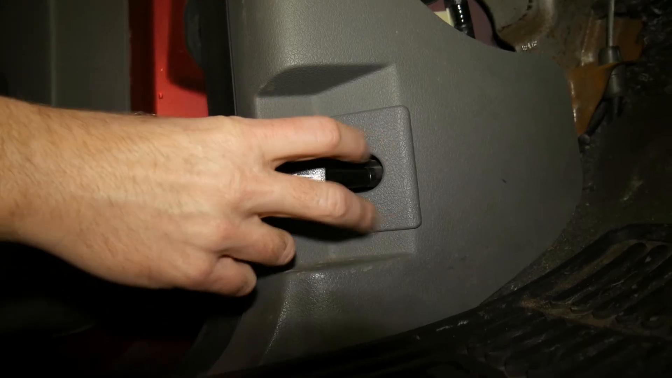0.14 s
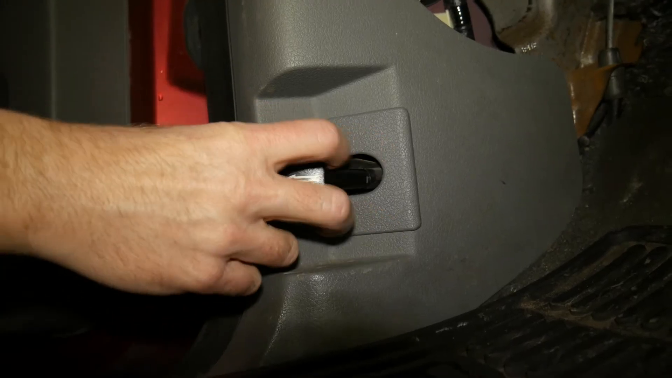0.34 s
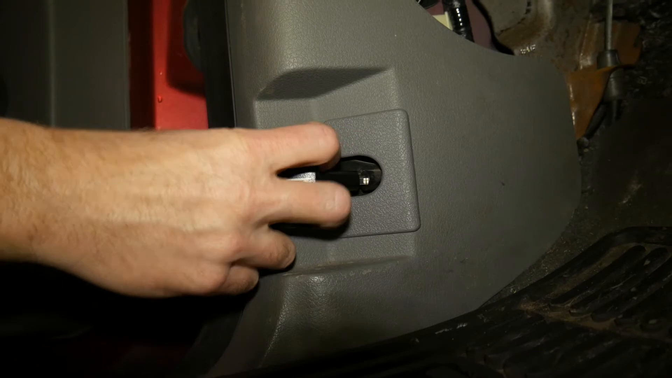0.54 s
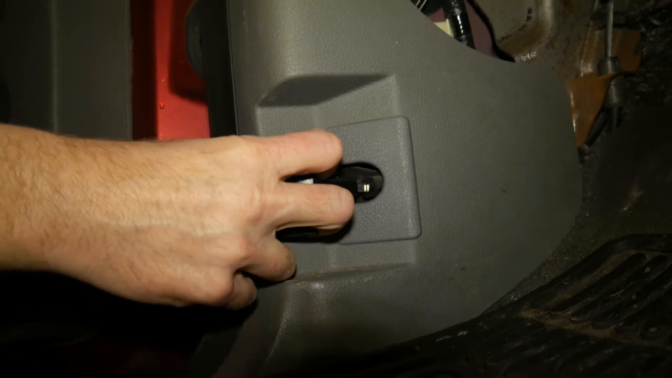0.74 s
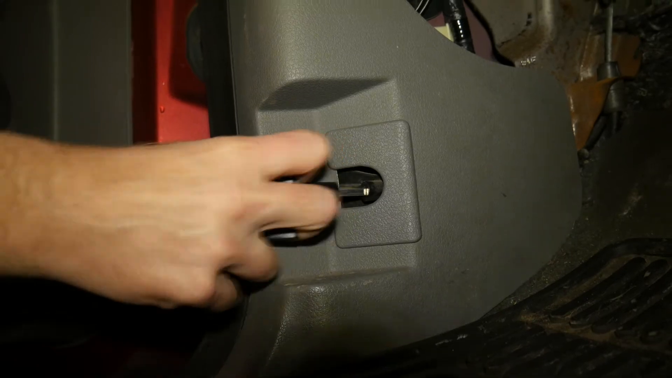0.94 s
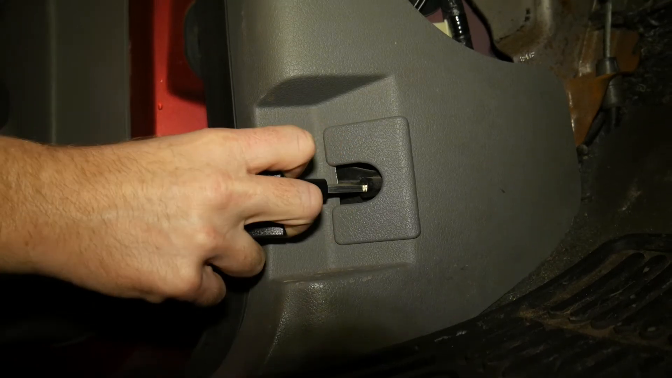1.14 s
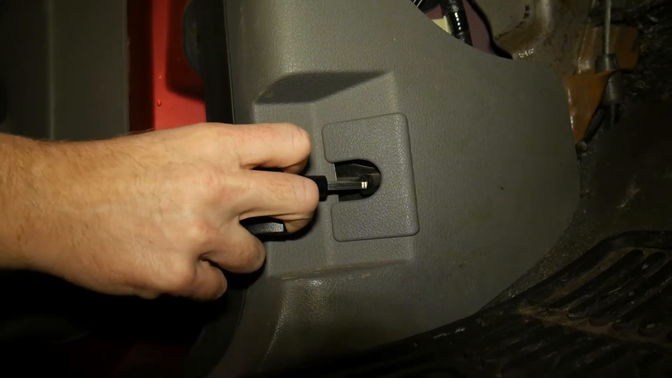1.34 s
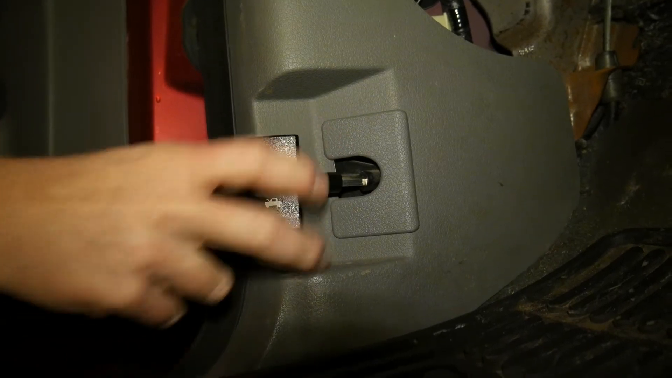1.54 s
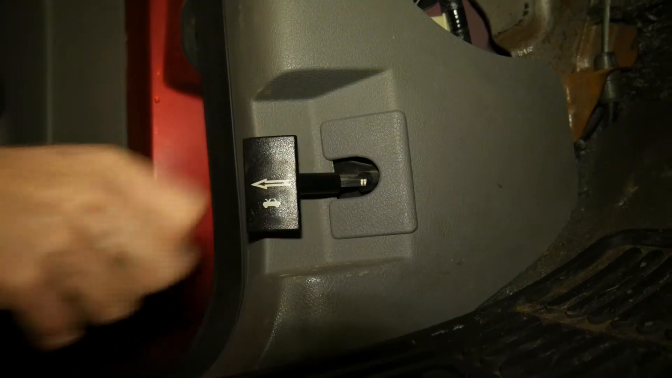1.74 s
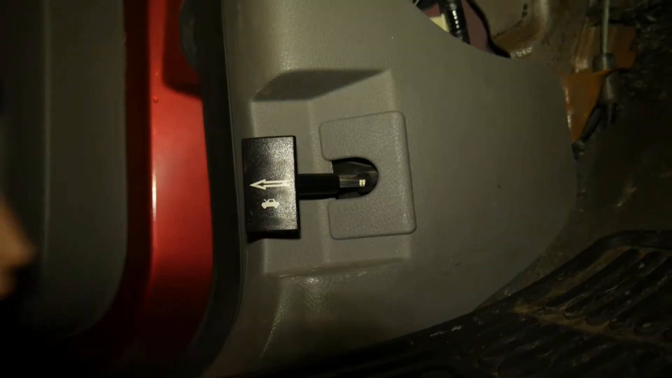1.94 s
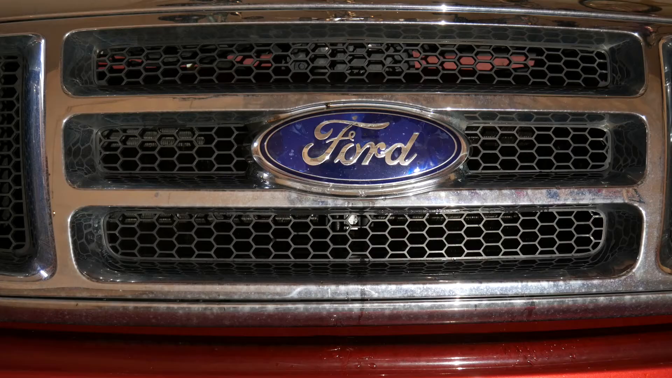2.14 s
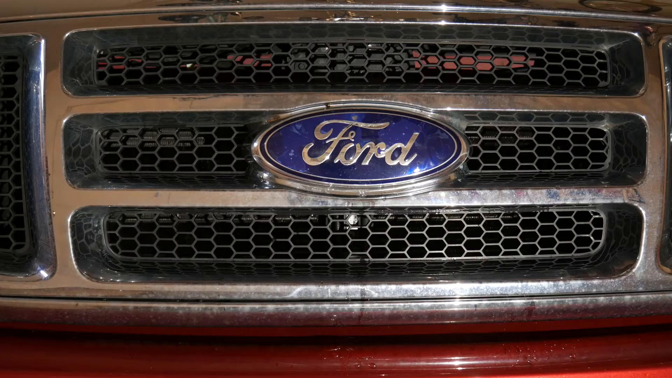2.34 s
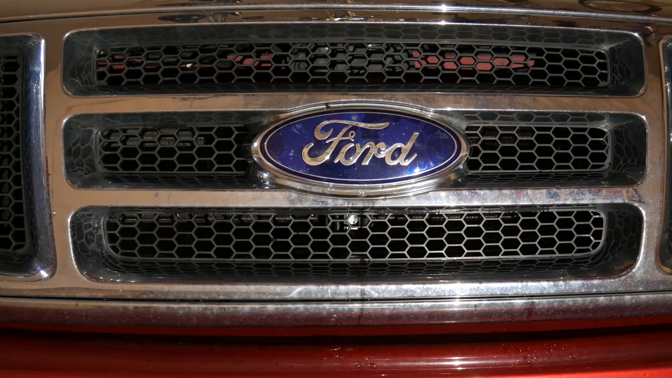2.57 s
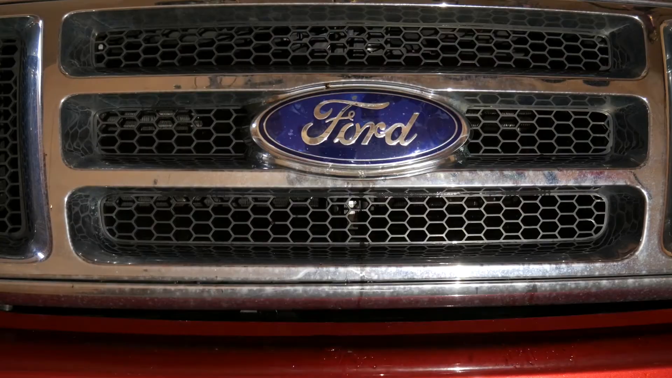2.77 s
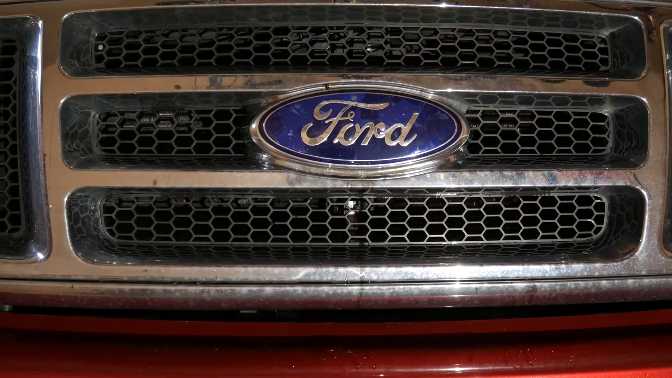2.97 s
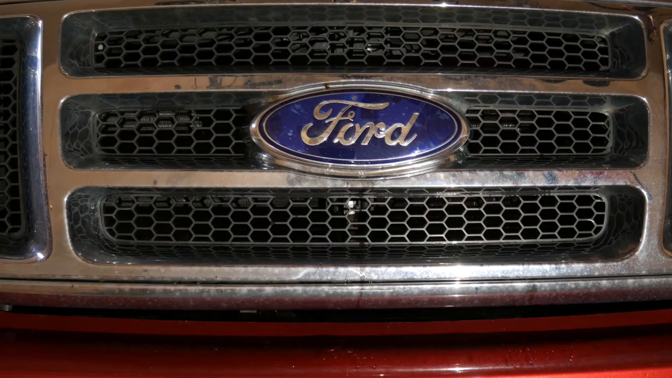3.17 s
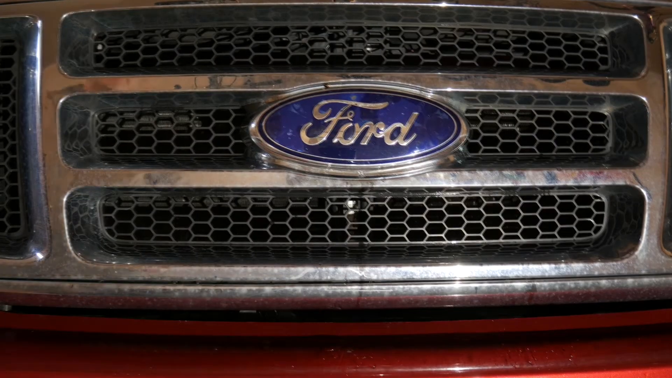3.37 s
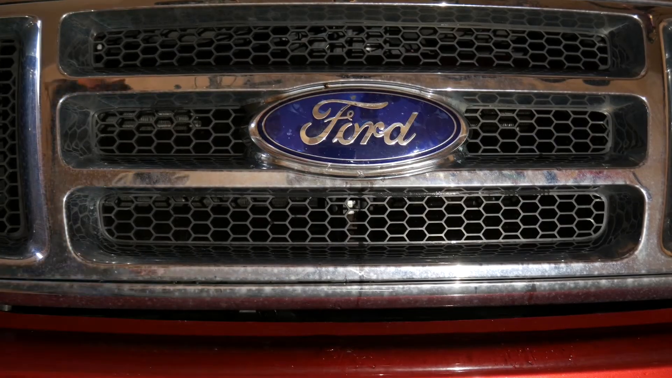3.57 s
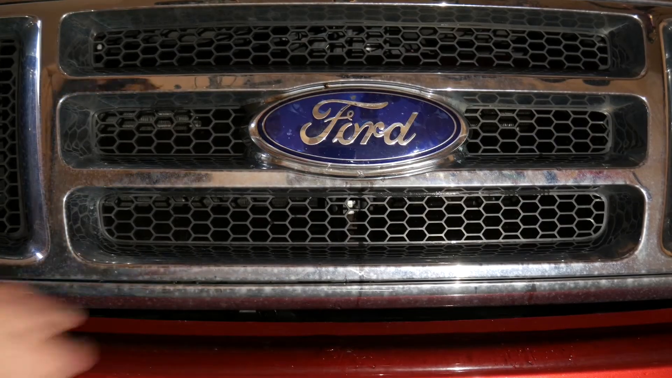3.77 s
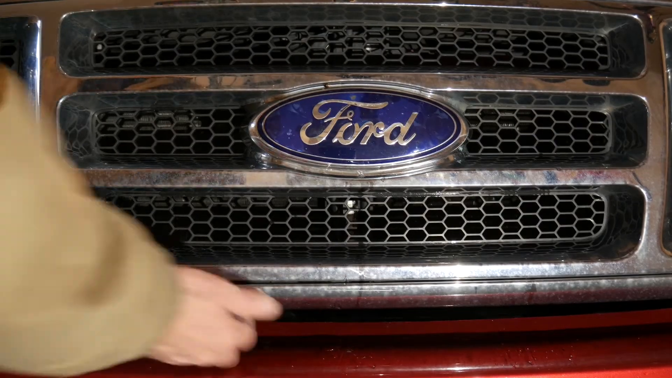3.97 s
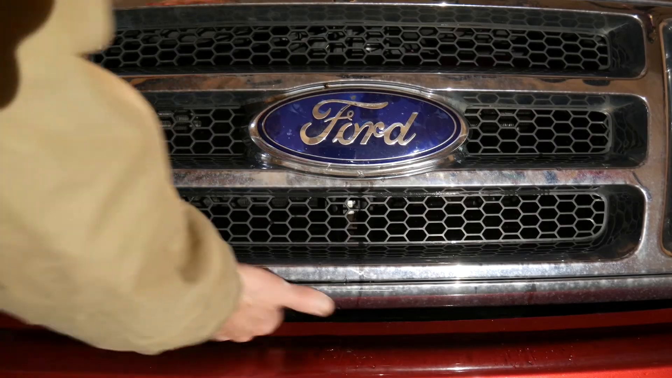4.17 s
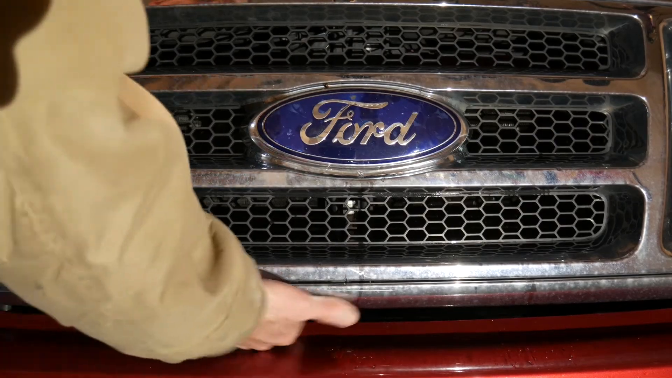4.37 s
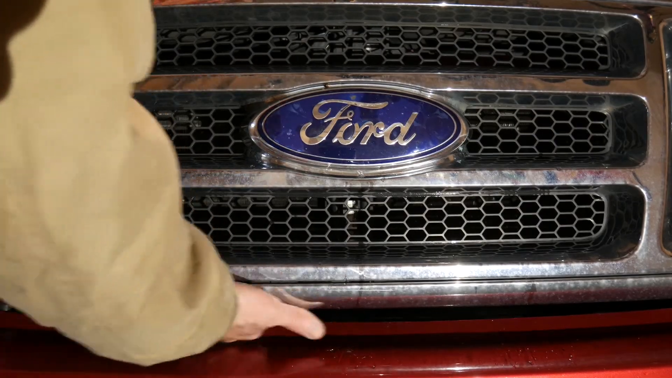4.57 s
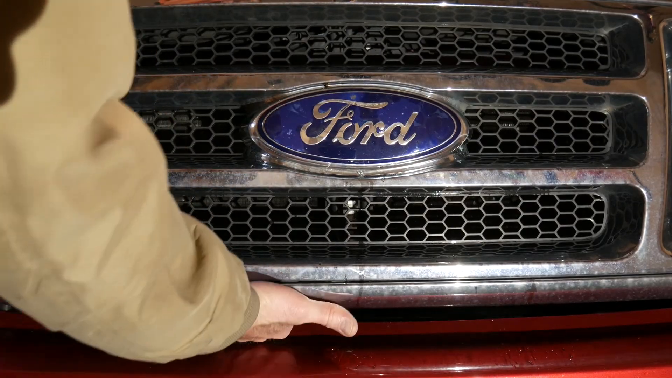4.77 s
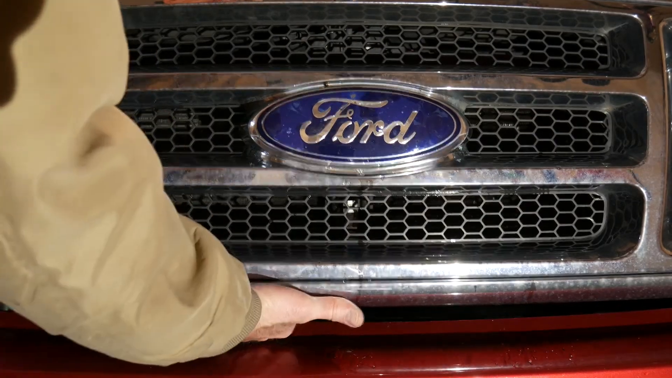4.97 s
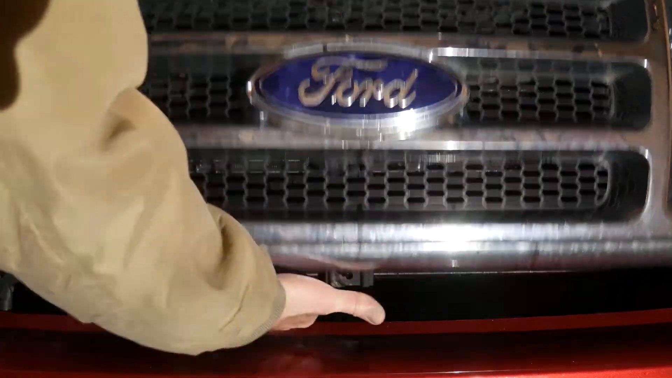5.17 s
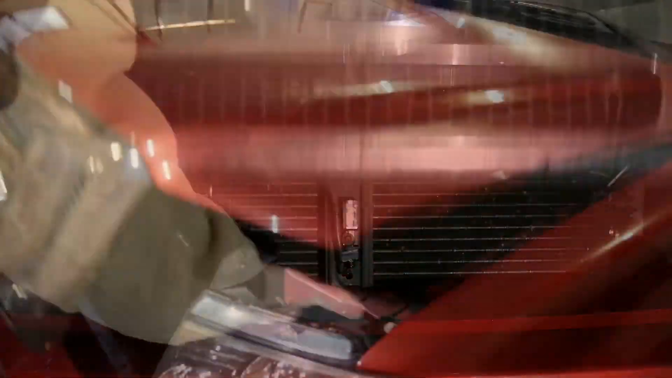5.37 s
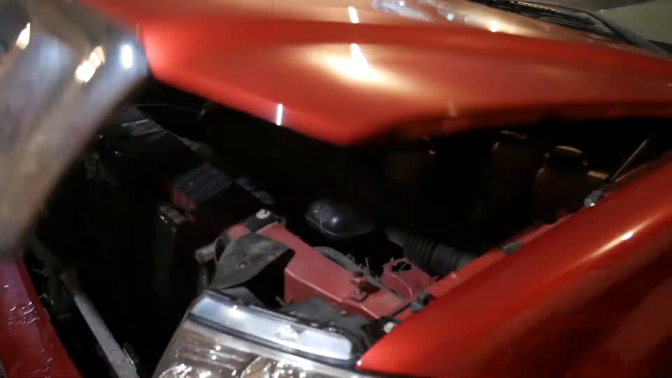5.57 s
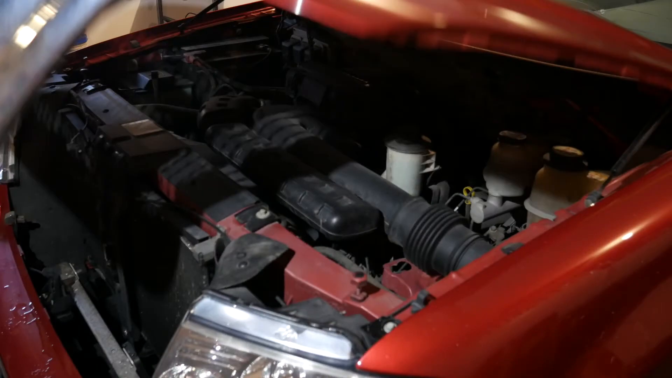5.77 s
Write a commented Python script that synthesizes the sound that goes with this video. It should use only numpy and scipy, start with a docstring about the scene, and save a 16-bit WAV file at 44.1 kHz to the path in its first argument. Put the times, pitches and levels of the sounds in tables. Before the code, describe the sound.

Stereo, close microphone. First a small, short-echoing cab: light plastic clicks, one big low cable thump, a softer return clunk. Then the front of the truck in a reverberant garage: a sharp metallic bang with a long tail, tiny chirping ticks, cloth rustle, finger knocks, a clank, a double clunk, then scraping and faint high springy hiss as the hood rises.

```python
"""A pickup's hood is opened in a garage. Over hiss and hum in the cab, a hand rubs and knocks the release lever,
pulls it until the cable thumps at 0.96 s, and lets go at 1.5 s. From 2.2 s the listener stands at the grille:
the latch pops at 2.66 s, small parts chirp, a sleeve brushes by, fingers find the safety catch, the catch clanks
at 4.7 and 5.1 s, and the hood swings up on scraping hinges as their springs sing.
Rubs are grainy shaped noise, knocks are noise clicks with dying sines, and heavy blows add long noise tails."""
import sys
import numpy as np
from scipy import signal
from scipy.fft import rfft, irfft, next_fast_len
from scipy.io import wavfile
from scipy.ndimage import uniform_filter1d

SR = 44100
rng = np.random.default_rng(int(sys.argv[2]) if len(sys.argv) > 2 else 0)


def master_out(mix):
    """Clip the mix to full scale and print it as 16-bit PCM to the path in sys.argv[1]."""
    frames = np.transpose(np.atleast_2d(mix))
    ceiling = np.clip(frames, -1, 1)
    pcm = np.round(ceiling * 32767).astype(np.int16)
    wavfile.write(sys.argv[1], SR, pcm)


N = 256485
TIME = np.arange(N) / SR  # s


def amp(db):
    """Decibels to gain."""
    return 10 ** (np.asarray(db) / 20)


def unit(x):
    """Scales to rms 1."""
    return x / np.sqrt(np.mean(x ** 2) + 1e-30)


def read(points, hz):
    """Reads a table on a log-frequency axis."""
    f, value = np.transpose(points)
    return np.interp(np.log(hz + 1), np.log(f + 1), value)


def add(mix, s, sound):
    """Mixes a sound in at time s."""
    part = mix[:, max(round(s * SR), 0):][:, :sound.shape[-1]]
    part += sound[..., :part.shape[1]]


def low_cut(x, hz):
    """Small parts and small microphones pass little deep bass."""
    return signal.sosfilt(signal.butter(2, hz, "highpass", fs=SR, output="sos"), x)


# stereo width of direct and of diffuse sound: (frequency [Hz], left-right likeness [0-1])
NEAR = [(100, 0.78), (500, 0.82), (1200, 0.75), (4000, 1), (12000, 0.86)]
FAR = [(100, 0.77), (300, 0.82), (1000, 0.57), (2000, 0.47), (4500, 1), (9000, 0.7), (14000, 0.15)]


def noise(colour, likeness, size, ripple_db=2.0, ripple_hz=45):
    """Two channels of partly alike noise with the given spectrum, roughened by random ripples."""
    hz = np.fft.rfftfreq(size, 1 / SR)
    mid, side = np.exp(2j * np.pi * rng.random((2, len(hz))))
    ripple = np.interp(hz / ripple_hz, np.arange(1000), rng.standard_normal(size=1000))
    ripple *= hz / (hz + 700)  # the ripple is weaker in the bass
    same = np.clip(read(likeness, hz), -1, 1)
    mid = mid * np.sqrt(1 + same)
    side = side * np.sqrt(1 - same)
    gain = amp(read(colour, hz) + ripple_db * ripple)
    return unit(irfft(np.array([mid + side, mid - side]) * gain, size))


# tilt of diffuse sound at share 1: (frequency [Hz], left minus right [dB])
LEAN = [(60, -5.5), (110, -2), (200, 6), (380, 3.5), (700, 11), (1290, 6), (2380, 4.5), (4400, 2),
        (8120, 2), (15000, -4.5)]


def lean(x, share):
    """Diffuse sound arrives with its middle range stronger on one side: left, or right if share is negative."""
    size = next_fast_len(x.shape[1])
    tilt = share * read(LEAN, np.fft.rfftfreq(size, 1 / SR))
    gains = amp([tilt / 2, -tilt / 2])
    return irfft(rfft(x, size) * gains / gains.mean(0), size)[:, :x.shape[1]]


def rub(gain, colour, grain_db, grain_s, likeness=FAR):
    """Noise under a stroke, broken into tiny slips."""
    slips = unit(uniform_filter1d(rng.standard_normal(N), max(int(grain_s * SR), 1)))
    grainy = noise(colour, likeness, next_fast_len(N))[:, :N] * amp(grain_db * slips)
    return gain * unit(grainy)


OUTSIDE_S = 2.2  # when the listener is first outside


def in_cab():
    """1 while the listener is in the cab, 0 once outside, with a quick crossfade."""
    return uniform_filter1d((TIME < OUTSIDE_S) * 1., size=200)


STROKE_RANGE_DB = 30  # a stroke's swell and fade times each span this many dB


def strokes(rows):
    """Gain of a run of strokes: each swells, holds and fades; those in the cab are not heard outside."""
    power = np.zeros(N)
    for s, db, swell_s, hold_s, fade_s in rows:
        before = np.maximum((s - TIME) / swell_s, 0)
        after = np.maximum((TIME - s - hold_s) / fade_s, 0)
        level_db = db - STROKE_RANGE_DB * np.minimum(before + after, 10)
        power += amp(level_db) ** 2 * (in_cab() if s < OUTSIDE_S else 1)
    return np.sqrt(np.abs(power))


def burst(colour, likeness, t60, rise_s, size, hold_energy):
    """Dying noise, dense as a cloud of modes; each band has its own decay, and bass needs a cycle to start."""
    t, hz = np.arange(size) / SR, np.fft.rfftfreq(size, 1 / SR)
    centres = np.geomspace(60, 15000, 12)
    z, out = rfft(noise(colour, likeness, size)), 0
    for centre, pick in zip(centres, np.eye(len(centres))):
        band = irfft(z * read(np.c_[centres, pick], hz), size)
        rise = 1 - np.exp(-(t / (rise_s + .5 / centre)) ** 2)
        shaped = band * amp(-60 * t / read(t60, centre)) * rise
        out = out + (unit(shaped) * band.std() if hold_energy else shaped)
    return out


def crack(colour, t60, db, bass_slope, span_s):
    """The short contact sound, db being its level over span_s; bass lasts longer than treble."""
    decay = [(hz, t60 * (hz / 3000) ** -bass_slope) for hz in np.geomspace(60, 15000, 9)]  # t60 is at 3 kHz
    x = burst(colour, NEAR, decay, 0, size=12000, hold_energy=True)
    return amp(db) * unit(x) * np.sqrt(span_s * SR / x.shape[1])


def ring(modes):
    """Struck modes as dying sines."""
    t = TIME[:SR * 2]
    return sum(amp(db - 60 * t / t60) * np.sin(2 * np.pi * hz * t) for hz, db, t60 in modes)


def echo(x, t60):
    """A diffuse, nearly white tail of energy 1."""
    tail = burst([(100, 0.0037), (15000, 0.0055)], FAR, t60, 0.0036, size=44100, hold_energy=False)
    return signal.fftconvolve(x, tail / np.linalg.norm(tail[0]), axes=1)[:, :N]


# swells of the hiss: (time of full strength [s], level [dB], swell [s], hold [s], fade [s])
HISS = [(1.8, -46, 1.4, 0, 1.3), (3.53, -51.5, 0.57, 1.15, 3), (5.81, -46, 1.1, 0, 1)]
# spectra of hiss, cab hum, outside air and rumble: (frequency [Hz], relative level [dB per Hz])
HISS_COLOUR = [(88, -44.5), (150, -31.5), (201, -11), (285, -27.5), (381, -4), (490, -4), (607, -18.5),
               (736, -6.5), (912, -6.5), (1510, -10), (2650, -10), (6730, -12.5), (15500, -27.5)]
HUM_COLOUR = [(30, -32), (65, -40), (85, 19), (105, -29.5), (350, -5), (900, -43), (3000, -70)]
AIR = [(530, -35), (900, 0), (2220, -5.5), (6500, -8.5), (8050, -13), (11200, -13.5), (15500, -12)]
RUMBLE = [(15, -53.5), (25, -33), (81, -9.5), (133, -2.5), (184, -3), (230, -7.5), (391, -13.5), (525, -8),
          (814, -17.5), (2000, -30.5), (2600, -41), (4400, -120)]
CAB_HISS_DB, HUM_DB, AIR_DB, RUMBLE_DB = -57, -56, -67, -60.5  # steady levels


def background():
    """A hiss that swells and sinks, a low hum in the cab, still air outside it, and rumble throughout, all noise."""
    cab = in_cab()
    hiss_gain = np.hypot(amp(CAB_HISS_DB) * cab, strokes(HISS))
    hiss = lean(rub(hiss_gain, HISS_COLOUR, grain_db=1.35, grain_s=0.023), share=1.7)
    hum = rub(amp(HUM_DB) * cab, HUM_COLOUR, grain_db=1.5, grain_s=.05, likeness=NEAR)
    air = amp(AIR_DB) * (1 - cab) * noise(AIR, FAR, next_fast_len(N))[:, :N]
    rumble = amp(RUMBLE_DB) * noise(RUMBLE, FAR, next_fast_len(N))[:, :N]
    return hiss + hum + air + rumble


# strokes of the fingers: (time of full strength [s], level [dB], swell [s], hold [s], fade [s])
GRIP = [(.28, -38.5, 0.11, 0.012, 0.031), (.356, -43.5, 0.0099, 0.01, .1), (.54, -52.5, 0.64, .06, 0.27),
        (.602, -45, .02, 0.041, 0.18)]
# their spectrum: (frequency [Hz], relative level [dB per Hz])
GRIP_COLOUR = [(100, -19.5), (160, 4.5), (420, -1.5), (700, -14), (1400, -11.5), (2600, -10.5), (3400, -18),
               (5500, -18.5), (14000, -34.5)]


def grip():
    """Fingers rub on the lever, close by: fine-grained noise."""
    return rub(strokes(GRIP), GRIP_COLOUR, grain_db=2, grain_s=0.0022, likeness=NEAR)


# click spectrum before dulling: (frequency [Hz], relative level [dB per Hz])
CLICK_COLOUR = [(100, -11), (400, 2), (6500, 1), (14000, -9.5)]
# dull thud under the note: (multiple of the note [1], relative level [dB per Hz])
THUD = [(.1, -30), (.35, -2), (.9, -2.5), (2.2, -28), (8, -75)]
CLICK_FALL_DB_PER_OCT = 11.5  # a click dulls above its edge


def knock(click_db, edge_hz, t60, note_hz, note_db, thud_db):
    """A click, brighter the higher its edge, and the struck spot's note over a dull thud."""
    hz = np.geomspace(60, 16000, 25)
    dulling_db = CLICK_FALL_DB_PER_OCT * np.log2(1 + (hz / edge_hz) ** 4) / 4
    click_colour = np.c_[hz, read(CLICK_COLOUR, hz) - dulling_db]
    click = crack(click_colour, t60, click_db, bass_slope=0.59, span_s=0.004)
    thud_colour = np.array(THUD) * [note_hz, 1]
    thud = crack(thud_colour, t60, note_db + thud_db, bass_slope=0.3, span_s=0.0044)
    note = ring([(note_hz, note_db, t60)])[:click.shape[1]]
    return click + thud + note


# light knocks of lever, latch and fingers:
# (time [s], click level [dB], click edge [Hz], t60 [s], note [Hz], note level [dB])
KNOCKS = [(0.191, -44.5, 800, .07, 474, -48), (0.28, -29, 1210, 0.044, 1245, -31.5),
          (0.297, -37, 1710, 0.029, 300, -33), (0.352, -44, 3000, .07, 400, -50),
          (0.368, -40, 1500, 0.11, 356, -31.5), (0.409, -41.5, 6000, 0.072, 432, -41),
          (0.544, -32.5, 3900, 0.058, 422, -29.5), (0.599, -44, 2510, .08, 2190, -41.5),
          (0.629, -37, 2200, 0.083, 298, -35), (0.745, -37, 4400, 0.03, 1040, -44),
          (0.931, -35, 4970, 0.32, 299, -30.5), (1.021, -40, 1200, 0.13, 230, -19),
          (1.056, -36, 1200, 0.17, 305, -17), (1.366, -39, 800, 0.051, 404, -32),
          (1.456, -31.5, 2030, 0.064, 413, -28.5), (1.522, -32, 4000, 0.093, 199, -31),
          (2.019, -39.5, 6000, 0.023, 4000, -40), (2.026, -34.5, 6530, 0.043, 4030, -37),
          (2.05, -39.5, 6000, 0.03, 3260, -46), (3.349, -29.5, 3500, 0.13, 329, -36),
          (3.788, -35, 1390, 0.16, 329, -37.5), (3.927, -33.5, 900, 0.055, 708, -33.5),
          (4.035, -51, 600, 0.1, 337, -24.5), (4.048, -35, 600, 0.094, 318, -27.5),
          (4.123, -26.5, 880, 0.067, 517, -23.5), (4.307, -25.5, 6100, 0.1, 419, -33),
          (4.381, -24.5, 9500, 0.14, 477, -30.5), (4.489, -36.5, 2440, 0.065, 364, -40),
          (4.626, -34.5, 1100, .06, 820, -29.5), (5.003, -27.5, 1970, 0.11, 1925, -35),
          (5.042, -25, 5950, 0.14, 486, -22.5), (5.338, -30.5, 7100, 0.087, 324, -31),
          (5.482, -21, 6350, .097, 306, -29.5)]
# the garage's reverberation: (frequency [Hz], t60 [s])
GARAGE = [(80, 1), (250, 0.82), (700, 1.04), (2000, 1.135), (5000, 0.98), (8000, 0.71), (14000, 0.25)]
CAB_T60 = 0.236  # s, the cab's short echo
CAB_THUD_DB, HOOD_THUD_DB = -1, -1.5  # thud against note, on plastic and on steel
CAB_ECHO_DB, GARAGE_ECHO_DB = -10, -7.5  # echo against direct knock


def knocks():
    """Light contacts on the lever echo in the cab; those on latch and hood echo in the garage."""
    cab, garage = np.zeros((2, 2, N))
    for s, *contact in KNOCKS:
        place, thud_db = (cab, CAB_THUD_DB) if s < OUTSIDE_S else (garage, HOOD_THUD_DB)
        add(place, s, knock(*contact, thud_db))
    cab_echo = amp(CAB_ECHO_DB) * echo(cab, [(1000, CAB_T60)])
    garage_echo = amp(GARAGE_ECHO_DB) * echo(garage, GARAGE)
    return low_cut(cab + garage + cab_echo + garage_echo, hz=100)


# modes of the plastic kick panel: (frequency [Hz], relative level [dB], t60 [s])
PANEL = [(112.4, -38.5, .16), (144, -0.5, 0.23), (187.5, -6.5, .09), (203.5, -6, 0.099),
         (320, -19.5, 0.096)]
# thumps of the lever on the panel: (time [s], level [dB])
THUMPS = [(0.3, -32), (0.373, -33), (0.414, -36.5), (0.551, -29), (0.65, -27.5), (0.75, -35),
          (0.9622, -7.5), (1.541, -21)]


def panel():
    """The lever thumps the hollow plastic panel that holds it: low dying sines."""
    out = np.zeros((2, N))
    thump = low_cut(low_cut(ring(PANEL), hz=100), hz=95.2)
    for s, db in THUMPS:
        add(out, s, amp(db) * thump)
    return out


# small parts that sing on after a contact: (time [s], frequency [Hz], level [dB], t60 [s], swell [s])
CHIRPS = [(.544, 3570, -26.5, 0.019, 0.00073), (1.456, 2590, -28, 0.048, 0.0027),
          (3.324, 218.5, -36, 0.7, 0.011), (3.35, 2330, -35, 0.09, 0.00077),
          (3.351, 2750, -28, 0.033, 0.00079), (3.35, 447, -45, 0.35, 0.0027),
          (3.518, 1480, -46, 0.31, 0.014), (3.55, 1410, -52, 0.44, 0.021), (3.58, 718, -42, 0.21, 0.0091)]


def chirps():
    """Springs, plastic and sheet metal each hold one note for a moment: a sine that swells and dies."""
    out, t = np.zeros((2, N)), TIME[:SR * 2]
    for s, hz, db, t60, swell_s in CHIRPS:
        add(out, s, ring([(hz, db, t60)]) * (1 - np.exp(-t / swell_s)))
    return out


def rattle(size, depth_db, grain_s, fade_s):
    """Loose parts chatter just after a blow, so its ring is uneven at first and smooth later."""
    chatter = unit(uniform_filter1d(rng.standard_normal(size), max(int(grain_s * SR), 1)))
    depth = depth_db * np.exp(-TIME[:size] / fade_s)
    return amp(depth * chatter - depth ** 2 * np.log(10) / 20)  # mean power stays the same


# spectra of each heavy blow's first crack, and of the ring it leaves in truck and garage:
# (frequency [Hz], relative level [dB per Hz])
PULL_CRACK = [(70, -28.5), (130, -6.5), (180, 1.5), (260, 3), (420, -22), (900, -22), (1600, -29),
              (2200, -14), (2500, -15), (2900, -31.5), (3900, -18.5), (5200, -44), (9000, -41),
              (15000, -51)]
PULL_RING = [(40, -37.5), (65, -13), (90, 1), (150, -3.5), (220, -6), (310, 8.5), (400, -3.5), (600, -17.5),
             (1200, -15.5), (1700, -21.5), (3500, -22.5), (4800, -18.5), (10000, -32), (15000, -34.5)]
RETURN_CRACK = [(47, -40), (80, 4), (355, -9), (815, -14.5), (1570, -16.5), (2040, -35), (3380, -19.5),
                (7120, -31), (8300, -13.5), (8870, -29), (15000, -48)]
RETURN_RING = [(41, -43), (70, -21), (150, -11), (241, -11), (301, 9), (632, -9.5), (1080, -1.5),
               (1210, -10.5), (1820, -17), (3640, -17), (4670, -9.5), (9790, -23.5), (15000, -53)]
POP_CRACK = [(60, -31.5), (110, -15), (210, 13.5), (350, 1.5), (510, 10), (900, -22.5), (1300, -28.5),
             (1700, -8), (2800, -10.5), (4800, 1), (6000, -8.5), (10400, -10), (12100, -30), (14700, -33.5),
             (16000, -47)]
POP_RING = [(30, -44), (50, -22.5), (100, -21), (170, -1.5), (230, -5), (285, 2), (380, -4), (570, -6.5),
            (1100, -19), (3300, -22), (4800, -18), (8000, -30.5), (10500, -30), (15000, -43)]
CATCH_CRACK = [(71, -43), (120, -20), (428, 2), (905, -9), (1040, -11), (1410, -14), (1950, -17),
               (2070, -23), (2200, -16.5), (3040, -9.5), (3500, -17), (4030, -13.5), (5350, -15.5),
               (5690, -20.5), (15000, -64)]
CATCH_RING = [(59, -67), (100, -16), (140, -39), (172, -1), (217, -8.5), (337, 2), (375, -10), (416, -1.5),
              (502, -3.5), (633, 0), (718, -7.5), (867, -5.5), (1630, -21), (4540, -22), (15000, -61)]
LIFT_CRACK = [(76, -38), (130, -3), (266, 0.5), (522, -3), (793, -11), (948, -10), (1530, -19), (1690, -5),
              (2180, -29), (2610, -6), (4740, -30), (5450, -16.5), (7340, -23.5), (13900, -51),
              (15000, -72)]
LIFT_RING = [(35, -62), (60, -49), (120, -21), (195, -5.5), (289, 1.5), (372, -12.5), (526, -5.5),
             (577, -15), (633, -11.5), (835, -21.5), (1100, -18.5), (1960, -28.5), (2470, -26.5),
             (5680, -35), (15000, -55.5)]
# modes of the lever with its cable end, the hood's sheet metal, the safety catch and the striker:
# (frequency [Hz], relative level [dB], t60 [s])
LEVER = [(2156, -7, 0.043), (2480, -8, 0.0416), (3790, -1, 0.011), (6420, -24.5, 0.046)]
HOOD = [(123, -23, 0.51), (180.4, -11.5, 1.38), (277, -8, 0.85), (488, -13, 1.44), (767, -21.5, 1.36),
        (960, -15, 0.78), (1230, -17.5, 1.2), (1490, -31, 0.58)]
CATCH = [(171.3, -6.5, 0.83), (305, -4, 0.11), (663, 4, 0.68), (710, -7, 0.2), (840, -12, 0.12),
         (910, 3.5, 0.23), (1134, 1, 0.26), (2100, -21, .3), (2960, -4, 0.31), (4020, -2, 0.11),
         (4650, -15, 0.064)]
STRIKER = [(126.2, -7.5, 0.63), (280.5, -3, 0.93), (516, 3.5, 0.14), (565, -10, 0.36), (645, -11, 0.67),
           (1166, -16, 0.85), (1620, -16, 0.52), (2250, -34, 0.27), (2506, -11, 0.25), (3660, -3, 0.052)]
# heavy blows: (time [s], crack level [dB], crack t60 at 3 kHz [s], ring level [dB], ring build-up [s],
# ring length [share of the garage's t60], lean of the ring [share], modes level [dB], modes,
# crack spectrum, ring spectrum)
BLOWS = [(0.9591, -30.5, 0.033, -52, .01, .4, 1.0, -18, LEVER, POP_CRACK, PULL_RING),
         (0.9621, -12.5, 0.038, -10, 0.038, 0.78, .8, -10.5, LEVER, PULL_CRACK, PULL_RING),
         (1.531, -26, 0.075, -25.5, 0.033, 0.83, .6, -31, LEVER, RETURN_CRACK, RETURN_RING),
         (2.6634, -9.5, 0.019, -11.5, 0.0021, 1.0, .1, -17, HOOD, POP_CRACK, POP_RING),
         (4.711, -15, 0.067, -18, 0.0078, 0.86, -.1, -27.5, CATCH, CATCH_CRACK, CATCH_RING),
         (5.116, -18, 0.076, -23.5, .01, 0.89, -.2, -31.5, STRIKER, LIFT_CRACK, LIFT_RING),
         (5.124, -21, 0.034, -18, 0.0067, 0.69, -.3, -20, STRIKER, LIFT_CRACK, LIFT_RING)]


def blows():
    """Cable, latch and catch: a crack, the struck part's modes, and a long rattling ring of steel and garage."""
    contact, tails = np.zeros((2, 2, N))
    for s, crack_db, t60, ring_db, rise_s, length, side, modes_db, modes, crack_colour, ring_colour in BLOWS:
        add(contact, s, crack(crack_colour, t60, crack_db, bass_slope=0.49, span_s=0.019))
        add(contact, s, amp(modes_db) * ring(modes))
        decay = np.array(GARAGE) * [1, length]
        tail = burst(ring_colour, FAR, decay, rise_s, size=57600, hold_energy=False)
        tail = tail * rattle(size=57600, depth_db=1.0, grain_s=.01, fade_s=0.64)
        add(tails, s, amp(ring_db) * lean(tail, side))
    return low_cut(contact, hz=122.0) + tails


# stroke of the arm: (time of full strength [s], level [dB], swell [s], hold [s], fade [s])
ARM_BACK = [(2.17, -41.5, 1.0, 0.0255, 0.086)]
# its spectrum: (frequency [Hz], relative level [dB per Hz])
ARM_COLOUR = [(410, -42.5), (700, -13), (787, -16.5), (1160, -0.5), (1730, -15), (2030, -3), (5430, -1),
              (13600, -16), (15500, -31.5)]


def arm_back():
    """The arm draws back: a soft swell of noise to one side."""
    return lean(rub(strokes(ARM_BACK), ARM_COLOUR, grain_db=0.5, grain_s=0.0032), share=0.95)


# strokes of the sleeve: (time of full strength [s], level [dB], swell [s], hold [s], fade [s])
SLEEVE = [(3.83, -41.5, 0.04, 0, .12), (4.03, -46, 1, 0.02, 0.39), (4.203, -32, 0.048, 0.03, 0.3),
          (4.68, -44, .1, 0.036, .05)]
# their spectrum: (frequency [Hz], relative level [dB per Hz])
SLEEVE_COLOUR = [(120, -35), (200, -8.5), (358, -4), (414, -44), (479, -42.5), (702, -17.5), (1400, -4),
                 (1560, -11.5), (1910, -6.5), (6470, -8), (13400, -28.5), (15500, -44)]


def sleeve():
    """A canvas sleeve brushes by: noise with no added grain."""
    return rub(strokes(SLEEVE), SLEEVE_COLOUR, grain_db=0.0, grain_s=.002)


# strokes of the catch: (time of full strength [s], level [dB], swell [s], hold [s], fade [s])
FUMBLE = [(4.05, -42, 0.24, 0, .16), (4.24, -39.5, 0.12, 0, 0.22), (4.4, -52, .3, 0.027, 0.49),
          (4.66, -42.5, 0.064, 0.039, 0.11), (5.105, -26, 0.19, 0.0022, .04)]
# their spectrum: (frequency [Hz], relative level [dB per Hz])
FUMBLE_COLOUR = [(59, -43), (100, -6), (475, 8), (803, -9), (967, 0.5), (1260, -40), (1910, -22),
                 (2160, -37), (2440, -14), (3650, -24), (4000, -11), (5200, -51), (8800, -120)]


def fumble():
    """The safety catch slides under the fingers: dark, slightly grainy noise."""
    return rub(strokes(FUMBLE), FUMBLE_COLOUR, grain_db=0.5, grain_s=0.012)


# stroke of the flexing hood: (time of full strength [s], level [dB], swell [s], hold [s], fade [s])
FLEX = [(5.39, -33.5, 0.42, 0.17, 0.31)]
# its spectrum: (frequency [Hz], relative level [dB per Hz])
FLEX_COLOUR = [(59, -50), (100, -27), (178, -9), (216, -14), (242, 0), (287, 2.5), (408, 0), (483, -8),
               (777, -7), (851, -7), (1080, -13.5), (1340, -15), (1500, -13), (1950, -35), (3300, -120)]


def flex():
    """The hood flexes as it lifts: low noise in coarse grains."""
    return rub(strokes(FLEX), FLEX_COLOUR, grain_db=1.5, grain_s=0.026)


# stroke of the hinges: (time of full strength [s], level [dB], swell [s], hold [s], fade [s])
HINGE = [(5.342, -34, 0.012, .16, 0.43)]
# its spectrum: (frequency [Hz], relative level [dB per Hz])
HINGE_COLOUR = [(410, -29.5), (700, -14), (873, 4), (1340, -30), (1450, 2.5), (1870, -6.5), (2370, 3.5),
                (3270, -6), (4470, 2.5), (5790, -6.5), (6850, -2), (8110, -15), (12100, -23.5),
                (14700, -27), (15500, -44)]


def hinge():
    """The hinges scrape: noise with several strong bands."""
    return rub(strokes(HINGE), HINGE_COLOUR, grain_db=0.5, grain_s=0.0045)


# stroke of the springs: (time of full strength [s], level [dB], swell [s], hold [s], fade [s])
HINGE_SPRING = [(5.75, -44.5, .8, .04, .6)]
# its spectrum: (frequency [Hz], relative level [dB per Hz])
HINGE_SPRING_COLOUR = [(2500, -17), (4000, -12), (4900, 0), (5800, -19), (9000, -14), (13000, -37)]


def hinge_springs():
    """The hinge springs sing as they relax: grainy noise peaking near 5 kHz."""
    return rub(strokes(HINGE_SPRING), HINGE_SPRING_COLOUR, grain_db=2.5, grain_s=0.0032)


def scene():
    """All sources at the microphone."""
    mix = background() + grip() + knocks() + panel() + chirps() + blows()
    mix = mix + arm_back() + sleeve() + fumble()
    return mix + flex() + hinge() + hinge_springs()


def gain_control(x, threshold_db, share, attack_s, recover_db_per_s):
    """Turns loud sound down within tens of milliseconds and recovers slowly; the first crack slips through."""
    power = signal.lfilter(np.ones(256) / 256, 1, (x ** 2).mean(0))
    over = np.maximum(10 * np.log10(power + 1e-12) - threshold_db, 0)
    # hold each peak and let it sink at a steady rate
    held = np.maximum.accumulate(over + recover_db_per_s * TIME) - recover_db_per_s * TIME
    pole = np.exp(-1 / (attack_s * SR))
    cut_db = min(share, 1) * signal.lfilter([1 - pole], [1, -pole], held)
    return x * amp(-cut_db)


CUT_HZ = 15600  # top of the band that passes


def record(dry):
    """Gain control, a soft overload, band limit."""
    x = gain_control(dry, threshold_db=-15.5, share=1.0, attack_s=0.02, recover_db_per_s=53)
    x = x / (1 + x ** 4) ** .25
    low_pass = signal.firwin(255, CUT_HZ, window=("kaiser", 9), fs=SR)
    return signal.oaconvolve(x, low_pass[None], "same", axes=1)


dry = scene()
out = record(dry)
master_out(out)
```